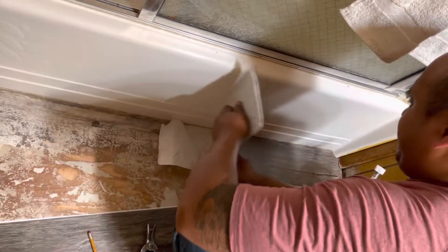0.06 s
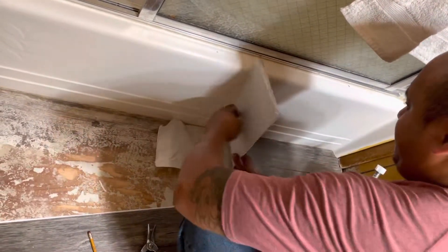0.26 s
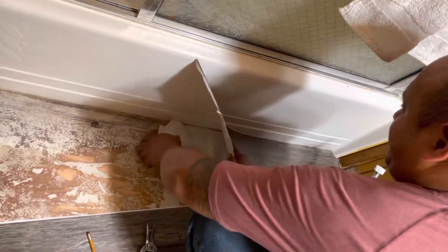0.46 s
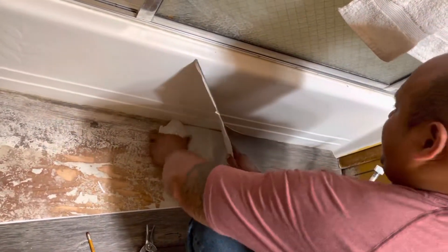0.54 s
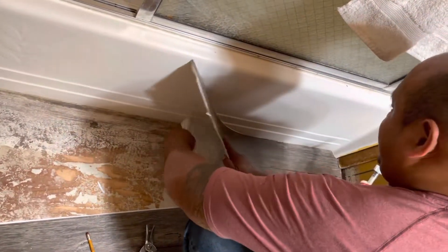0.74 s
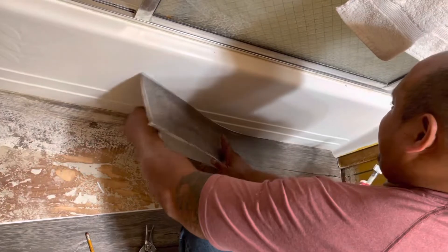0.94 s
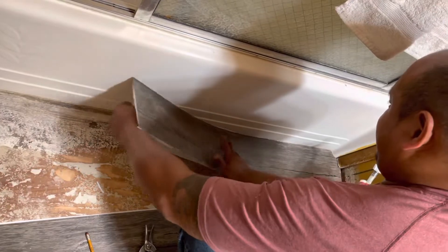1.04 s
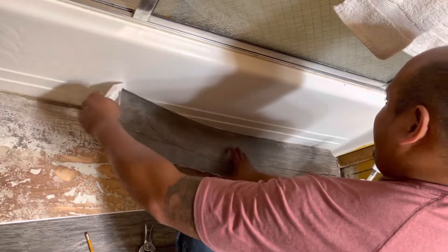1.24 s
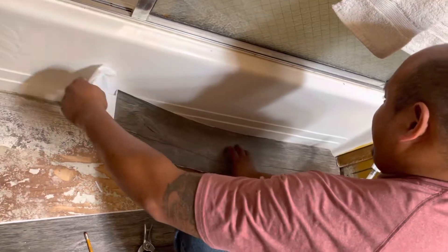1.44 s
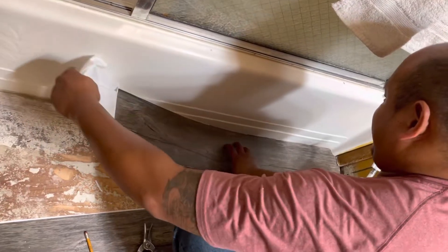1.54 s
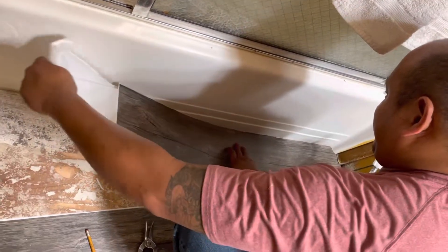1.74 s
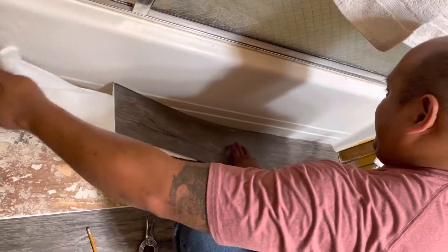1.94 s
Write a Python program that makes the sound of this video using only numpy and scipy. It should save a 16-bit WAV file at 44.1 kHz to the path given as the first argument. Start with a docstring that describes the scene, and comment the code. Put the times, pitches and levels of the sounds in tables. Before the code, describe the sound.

A stiff tile is peeled off a wooden floor. Two dull thumps shake the boards, then the glue cracks and gives in two sharp rips, crackling on as the sheet flaps and ticks, close up in a small room.

```python
"""Peeling up a floor tile

A stiff tile is pulled off a wooden floor in a small room, close to the microphones. Two main thumps
shake the boards; then the glue lets go with a few cracks and two sharp rips. Its tiny threads keep
snapping as the tile comes up, and the bending sheet flaps, rustles and ticks."""
import sys
import numpy as np
from scipy import signal
from scipy.fft import rfft, irfft, next_fast_len
from scipy.io import wavfile
from scipy.ndimage import map_coordinates

SR = 44100
rng = np.random.default_rng(int(sys.argv[2]) if len(sys.argv) > 2 else 0)


def master_out(mix):
    """Clip the mix to full scale and print it as 16-bit PCM to the path in sys.argv[1]."""
    frames = np.transpose(np.atleast_2d(mix))
    ceiling = np.clip(frames, -1, 1)
    pcm = np.round(ceiling * 32767).astype(np.int16)
    wavfile.write(sys.argv[1], SR, pcm)


N = 88200
T = np.arange(N) / SR

# the tone of cracking glue: f/Hz, level/dB
CRACK_TONE = [(400, -15.5), (750, -4), (2200, 1.5), (3400, -0.5), (4800, -2.5), (7000, -1), (11200, -3),
              (12500, -12), (15000, -40)]
# the tone of the tile slipping or scuffing: f/Hz, level/dB
SLIP_TONE = [(200, -14), (720, 6.5), (1200, 0.5), (3600, 0.5), (5000, -7.5), (11000, -3.5), (14000, -32)]


def amp(db):
    """Turn decibels into a number to multiply by."""
    return 10 ** (np.asarray(db) / 20)


def unit(x):
    """Scale x to an average power of 1."""
    return x / np.sqrt(np.mean(x ** 2) + 1e-20)


def along(points, hz):
    """Read between the rows of a (frequency, value) table, on a pitch scale."""
    freqs, values = np.transpose(points)
    return np.interp(np.log(hz + 1), np.log(freqs + 1), values)


def curves(rows):
    """Join the rows of a timetable into one curve for each column after the time."""
    times, *columns = np.transpose(rows)
    return [np.interp(T, times, column) for column in columns]


def wobble(rate):
    """A smooth curve through `rate` random values a second."""
    return map_coordinates(rng.standard_normal(int(N * rate / SR) + 4), [T * rate])


def coloured(x, tone, tilt_db=0):
    """Filter x to the given tone; tilt_db brightens it by that much per octave."""
    size = 2 * next_fast_len(N // 2 + 4096)
    hz = np.fft.rfftfreq(size, 1 / SR)
    gain = unit(amp(along(tone, hz) + tilt_db * np.log2(hz + 20)))
    # folding the cepstrum makes the filter ring after a click, never before it
    cepstrum = irfft(np.log(gain + 1e-6))
    cepstrum[1:size // 2] *= 2
    cepstrum[size // 2 + 1:] = 0
    return irfft(rfft(x, size) * np.exp(rfft(cepstrum)))[..., :N]


def dying_noise(fade_times, size):
    """Noise in which each frequency takes its own time to fade by 60 dB."""
    hz, t, spectrum = signal.stft(rng.standard_normal(size), SR, nperseg=256)
    fade = amp(-60 * t / along(fade_times, hz)[:, None])
    return signal.istft(spectrum * fade, SR, nperseg=256)[1][:size]


def grains(per_s, spread_db):
    """Tiny clicks at random moments and of random size."""
    happens = rng.random(N) < per_s / SR
    size = amp(spread_db * np.clip(rng.standard_normal(N), -2, 2))
    return unit(happens * rng.choice([-1, 1], N) * size)


def swell(at, rise, fall):
    """A level that climbs to a sharp peak at time `at`, then dies away."""
    return np.exp(np.minimum((T - at) / rise, (at - T) / fall))


def burst(at, db, rise, fall):
    """A rush of tiny breaks; the more sudden it is, the harder the snap at its peak."""
    snap_db, snap_rise_s = 16, 0.00093
    clicks = swell(at, rise, fall) * grains(per_s=4500, spread_db=1)
    clicks[round(at * SR)] += amp(snap_db) * np.exp(-rise / snap_rise_s)
    return amp(db) * clicks


def peeling_glue():
    """Glue threads snap as the peeling edge moves in small jerks; now and then a thick one pops."""
    # strength of the peeling: t/s, coarse crackle/dB, fine fizz/dB
    levels = [(0, -47.5, -49.5), (.17, -61, -63.5), (.26, -55, -46), (.325, -55, -48.5), (.39, -70, -71),
              (.53, -54, -56), (.6, -38.5, -42), (.7, -31, -35.5), (.79, -33, -37.5), (.89, -33, -35),
              (.94, -40, -37), (1.15, -32.5, -32), (1.21, -36.5, -36), (1.31, -31.5, -27.5),
              (1.41, -37, -34.5), (1.5, -36, -31.5), (1.6, -33, -28), (1.71, -40.5, -35),
              (1.84, -42, -33.5), (2, -40, -33)]
    # tone of the coarse crackle: f/Hz, level/dB
    coarse_tone = [(200, -4), (700, -1.5), (1500, -0.5), (2050, -0.5), (2550, 4.5), (3400, -2), (4300, 3),
                   (7000, -19.5), (12000, -45)]
    # tone of the fine fizz: f/Hz, level/dB
    fizz_tone = [(1000, -42), (3000, -14.5), (4800, -3), (6500, 0), (9000, -3), (10900, 4), (12000, -7.5),
                 (13300, -15.5), (15200, -62)]
    coarse_db, fizz_db = curves(levels)
    jerk_db = 1.5 * wobble(rate=90)
    coarse = coloured(amp(coarse_db + jerk_db) * grains(per_s=2500, spread_db=-0.5), coarse_tone)
    pops = coloured(amp(coarse_db - 12.5) * grains(per_s=90, spread_db=3), CRACK_TONE)
    fizz = coloured(amp(fizz_db + jerk_db) * grains(per_s=2800, spread_db=-1), fizz_tone)
    return coarse + pops + fizz


def bending_tile():
    """The tile rustles and groans as it bends, over the low rumble of the floor."""
    # strength of the rubbing and bending: t/s, rustle/dB, rumble/dB
    levels = [(0, -83, -59), (.17, -56, -54.5), (.55, -62, -80), (.7, -36.5, -47), (.83, -47, -39),
              (.98, -47, -53), (1.07, -47.5, -43), (1.17, -43, -81), (1.35, -32, -37), (1.42, -37.5, -39.5),
              (1.47, -36.5, -57), (1.55, -37.5, -46), (1.67, -37, -44), (1.8, -47, -47.5), (2, -41.5, -46)]
    # tone of the tile's rustle: f/Hz, level/dB
    rustle_tone = [(200, -15.5), (290, 4.5), (520, -1), (680, 5), (930, 1), (1100, -2.5), (2500, -43.5)]
    # tone of the floor's rumble: f/Hz, level/dB
    rumble_tone = [(20, -7.5), (45, -40), (72, -2.5), (95, -9.5), (135, 3.5), (200, -12.5), (1500, -33)]
    # the bent tile's low rub: t/s, level/dB, time spread/s, f/Hz, pitch spread/Hz
    low_rub = (1.925, -38, .045, 290, 90)
    rustle_db, rumble_db = curves(levels)
    rustle = coloured(amp(rustle_db) * grains(per_s=970, spread_db=-2), rustle_tone)
    rumble = coloured(amp(rumble_db) * rng.standard_normal(N), rumble_tone)
    at, db, spread_s, hz, spread_hz = low_rub
    phase = 2 * np.pi * hz * T
    rough_note = unit(wobble(2 * spread_hz) * np.sin(phase) + wobble(2 * spread_hz) * np.cos(phase))
    groan = amp(db) * np.exp(-.5 * ((T - at) / spread_s) ** 2) * rough_note
    return rustle + rumble + groan


def tile_flaps():
    """The tile clacks or flips over and rings hollowly; each hit favours the notes near one pitch."""
    # the tile's hits: t/s, level/dB, favoured pitch/Hz
    hits = [(.2012, -9.5, 940), (.4225, -19.5, 970), (1.322, -24.5, 433), (1.45, -24.5, 770),
            (1.641, -26.5, 680), (1.731, -28, 725)]
    # the notes the tile rings at: f/Hz, level/dB, time to fade 60 dB/s
    notes = [(295, 1.5, 0.11), (424.2, -6.5, 0.45), (688.6, 0.5, 0.071), (835, 3, 0.041),
             (941, -7.5, 0.054)]
    octave_away_db = -10
    out = np.zeros(N)
    for at, db, centre_hz in hits:
        t = np.maximum(T - at, 0)
        ring = np.zeros(N)
        for hz, note_db, fade_s in notes:
            start_db = note_db + octave_away_db * np.log2(hz / centre_hz) ** 2
            ring += amp(start_db - 60 * t / fade_s) * np.sin(2 * np.pi * hz * t)
        attack = 1 - np.exp(-(t * centre_hz / 2) ** 2)
        out += amp(db) * ring * attack
    return out


def floor_thumps():
    """The tile scuffs down and the boards ring over a dull thud, their low notes building slowly."""
    # blows on the floor: t/s, level/dB, rise/s, tilt/dB per octave, spot struck/0 to 1
    blows = [(.2025, -14.5, 0.0072, 0, 0.09), (0.317, -28, 0.0045, -13, 1), (.424, -17.5, 0.0029, 0.6, 0.7),
             (1.322, -53.5, .006, 4, 0.5)]
    # the boards' notes: f/Hz, level at spot 0/dB, level at spot 1/dB, time to fade 60 dB/s
    notes = [(57.4, -35, -13, 0.96), (74.8, -6.5, 1.5, 0.48), (102, -17, -14, 0.26), (129.5, -2, -24, 0.37),
             (154, -3, -4, 0.46), (184.6, 0, -13.5, 0.45), (286.6, -7.5, -7, 0.52), (310.8, -0.5, -14, 0.3),
             (389.7, -4, -17.5, 0.68), (439.6, -3, -10, 0.35), (495, -5.5, -6, 0.38), (524, -10, -13, 0.52),
             (676, -0.5, -29, 0.25), (878, -7.5, -30, 0.32)]
    # tone of the thud: f/Hz, level/dB
    thud_tone = [(25, -31), (65, 6), (420, 1.5), (880, -7.5), (1200, -14), (3500, -30), (11000, -38),
                 (14000, -64)]
    # how long the thud lasts: f/Hz, time to fade 60 dB/s
    thud_fade = [(60, 0.47), (900, 0.37), (2000, 0.2), (10000, 0.069)]
    lowest_hz, build_cycles, scuff_s = notes[0][0], 0.81, 0.0079
    out = np.zeros(N)
    for at, db, rise, tilt, spot in blows:
        t = np.maximum(T - at, 0)
        attack = 1 - np.exp(-t / rise)
        ring = np.zeros(N)
        for hz, spot0_db, spot1_db, fade_s in notes:
            start_db = spot0_db + spot * (spot1_db - spot0_db) + tilt * np.log2(hz / lowest_hz)
            build = 1 - np.exp(-(t * hz / build_cycles) ** 2)
            wave = np.sin(2 * np.pi * (hz * t + rng.random()))
            ring += amp(start_db - 60 * t / fade_s) * build * wave
        noise = np.pad(dying_noise(thud_fade, N), (round(at * SR), 0))[:N]
        thud = coloured(noise * attack, thud_tone, tilt)
        scuff = coloured(swell(at, scuff_s, scuff_s) * rng.standard_normal(N), SLIP_TONE)
        out += amp(db) * (amp(-2.5) * ring * attack + amp(-1.5) * thud + amp(-18.5) * scuff)
    return out


def cracks():
    """Patches of glue give way; during the first rip the stiff tile itself snaps."""
    # breaks in the glue: t/s, level/dB, rise/s, fall/s, tilt/dB per octave
    breaks = [(0.541, -28, 0.0006, 0.0092, 0), (0.587, -16, 0.0004, 0.0061, 4),
              (0.621, -24.5, 0.00092, 0.0093, -1.5), (0.6435, -19, 0.00088, 0.009, 3),
              (0.669, -15, 0.0088, 0.009, -.3), (.737, -20, 0.0058, 0.013, -0.5),
              (0.757, -11, 0.0044, 0.013, 1), (0.772, -15.5, 0.0073, 0.0018, 5.5),
              (0.842, -24, 0.015, 0.018, -0.5), (0.879, -23.5, 0.00098, 0.012, -1),
              (1.16, -27.5, 0.018, 0.01, -3), (1.233, -21, 0.00045, 0.0035, -1.5),
              (1.249, -25.5, 0.00089, 0.014, -1.5), (1.266, -19.5, .001, 0.0062, 1),
              (1.2875, -12.5, 0.00091, 0.0023, 2.5), (1.298, -17.5, .0012, 0.0054, 2),
              (1.329, -24, 0.0027, 0.0054, -2)]
    # the tile's snap: t/s, level/dB, fall/s
    tile_snap = (.6668, -15.5, 0.005)
    # tone of that snap: f/Hz, level/dB
    snap_tone = [(500, -10), (1400, -1.5), (2000, 7.5), (2900, -10), (14000, -27)]
    glue = sum(coloured(burst(at, db, rise, fall), CRACK_TONE, tilt)
               for at, db, rise, fall, tilt in breaks)
    at, db, fall = tile_snap
    snap = amp(db) * (T > at) * swell(at, fall, fall) * rng.standard_normal(N)
    return glue + coloured(snap, snap_tone)


def tile_ticks():
    """The bent tile slips a little, each time with a dry tick."""
    # short slips: t/s, level/dB, rise/s, fall/s
    slips = [(1.533, -28, 0.00083, 0.0045), (1.577, -23, 0.00045, 0.0085), (1.589, -23, 0.0032, 0.011),
             (1.642, -18.5, .0004, 0.0025), (1.682, -28, 0.00055, 0.0013), (1.7311, -26, 0.00024, 0.0043)]
    return coloured(sum(burst(*slip) for slip in slips), SLIP_TONE)


def room(x):
    """The direct sound and, about 3 ms later, the short echo from the walls."""
    # how long the echo lasts: f/Hz, time to fade 60 dB/s
    echo_fade = [(150, 0.38), (2000, 0.17), (10000, 0.18)]
    tail = dying_noise(echo_fade, size=16384)
    echo = np.pad(tail / np.linalg.norm(tail), (130, 0))
    return x + amp(-7.5) * signal.fftconvolve(x, echo)[:N]


def spread_to_stereo(x):
    """Spread the sound over left and right: at each pitch the two sides differ a little in timing, level and
    likeness."""
    # how far the left side is ahead: f/Hz, phase/radians
    lead = [(100, 0), (1000, -.25), (1500, 0), (3000, 0), (4000, 1.7), (5000, 3.6), (5700, 6.28),
            (6150, 6.3), (8400, 9.35), (9500, 9.45), (11900, 12.57)]
    # how alike the two sides are: f/Hz, likeness/0 to 1
    likeness = [(120, .997), (700, .86), (1600, .997), (2500, .98), (3400, .3), (5300, .7), (6000, .99),
                (7800, .78), (8800, .999), (10800, .85), (12000, .997)]
    # how much louder the left side is: f/Hz, level/dB
    balance = [(60, .5), (640, 2.8), (1100, -.3), (3200, -1), (4200, .1)]
    size = next_fast_len(N + 8192)
    hz = np.fft.rfftfreq(size, 1 / SR)
    spectrum = signal.stft(x, nperseg=256)[2]
    scrambled = spectrum * np.exp(2j * np.pi * rng.random(spectrum.shape))
    scatter = unit(signal.istft(scrambled, nperseg=256)[1][:N]) * np.std(x)
    mix_angle = np.arccos(np.clip(along(likeness, hz), 0, 1)) / 2
    sides = np.array([[1], [-1]])  # left, right
    pair = np.cos(mix_angle) * rfft(x, size) + sides * np.sin(mix_angle) * rfft(scatter, size)
    gain = amp(sides * along(balance, hz) / 2)
    timing = np.exp(.5j * sides * along(lead, hz))
    return irfft(pair * gain * timing, size)[:, :N]


def scene():
    """Thumps, then the tile coming up; only the cracks, ticks and crackle get the room's echo."""
    low_sounds = floor_thumps() + tile_flaps() + bending_tile()
    sharp_sounds = cracks() + tile_ticks() + peeling_glue()
    return spread_to_stereo(low_sounds + room(sharp_sounds))


def record(dry):
    """Cut the deepest bass, round off the tallest peaks and remove the highest treble."""
    low_cut_hz, ceiling, top_hz = 23, .85, 15300
    x = signal.sosfilt(signal.butter(4, low_cut_hz, "high", fs=SR, output="sos"), dry)
    rounded = x / (1 + np.abs(x / ceiling) ** 6) ** (1 / 6)
    size = next_fast_len(N + 8192)
    below_top = np.fft.rfftfreq(size, 1 / SR) < top_hz
    return irfft(rfft(rounded, size) * below_top, size)[:, :N]


dry = scene()
out = record(dry)
master_out(out)
```